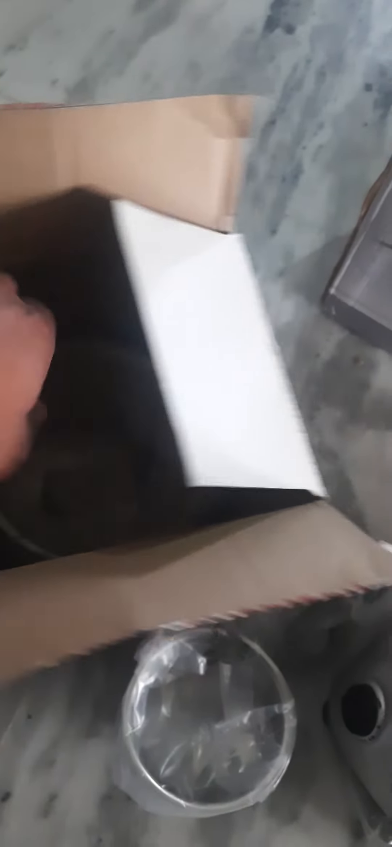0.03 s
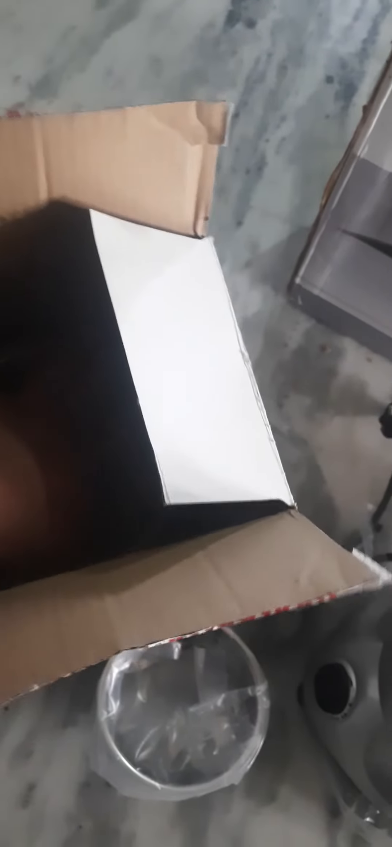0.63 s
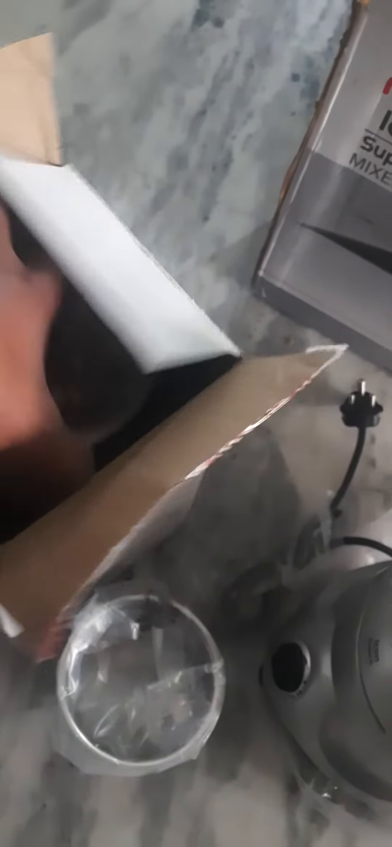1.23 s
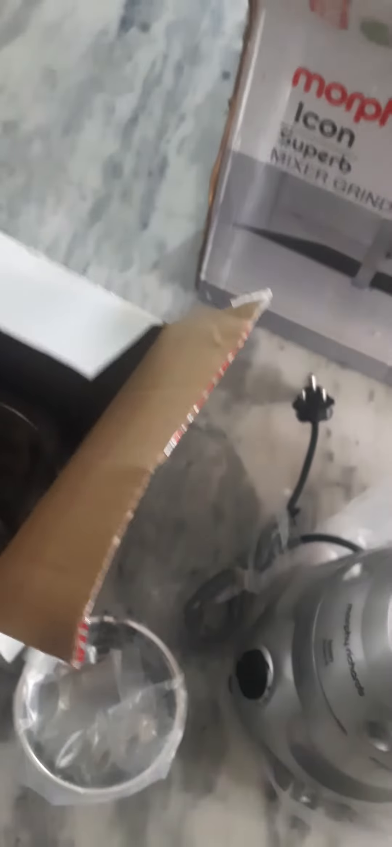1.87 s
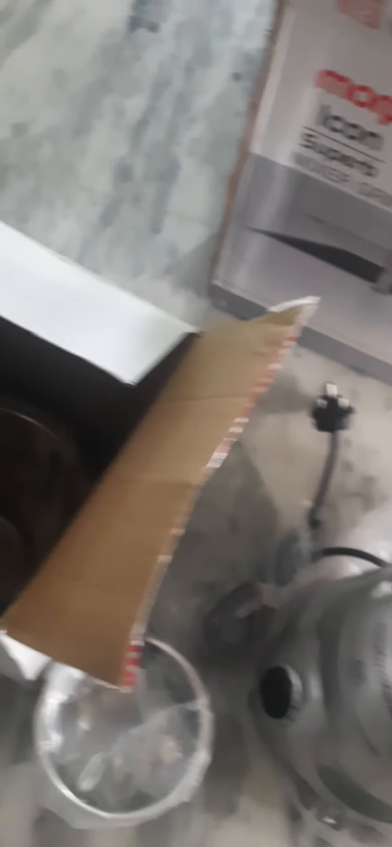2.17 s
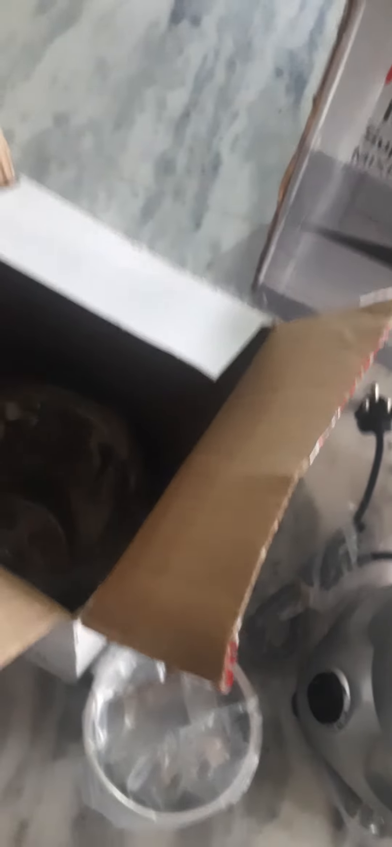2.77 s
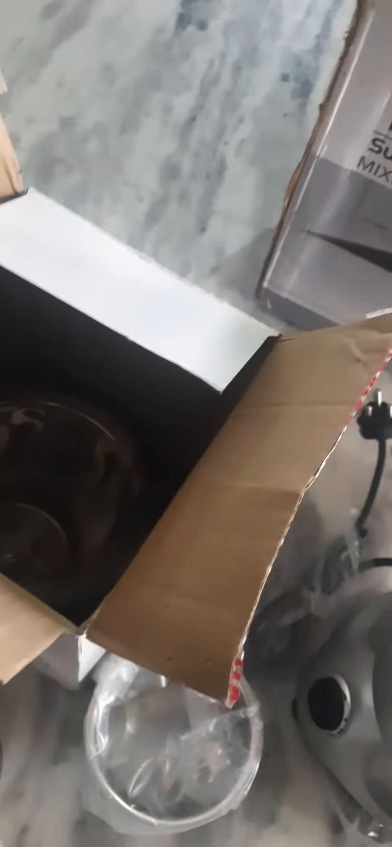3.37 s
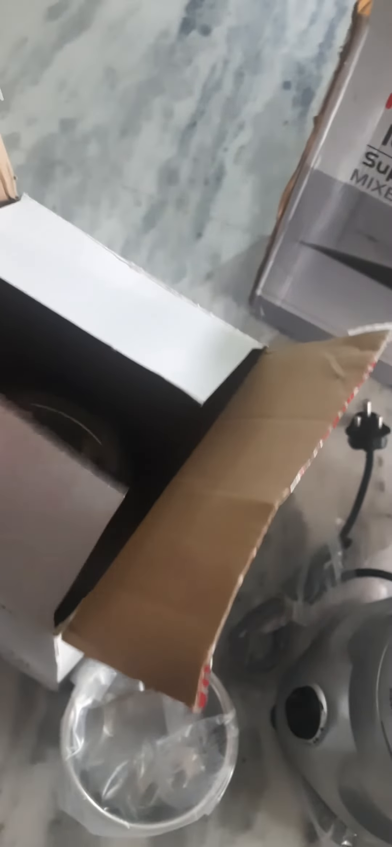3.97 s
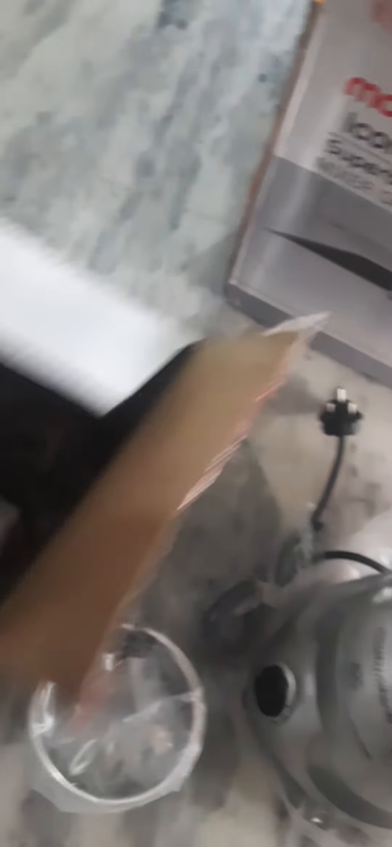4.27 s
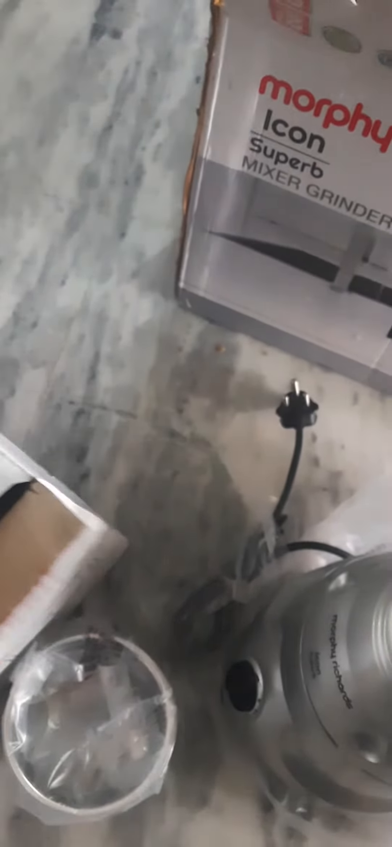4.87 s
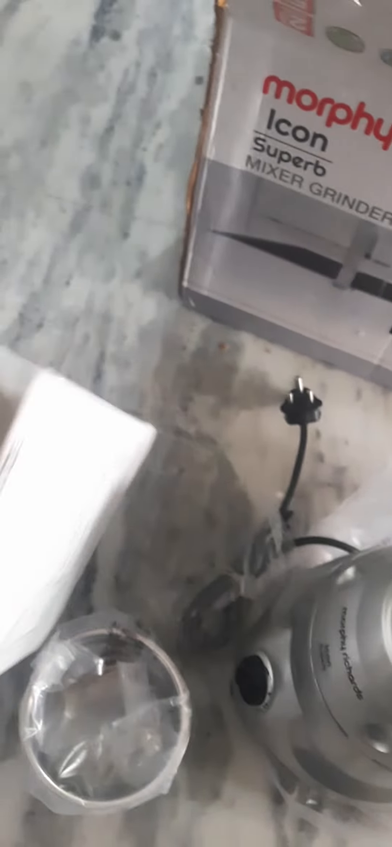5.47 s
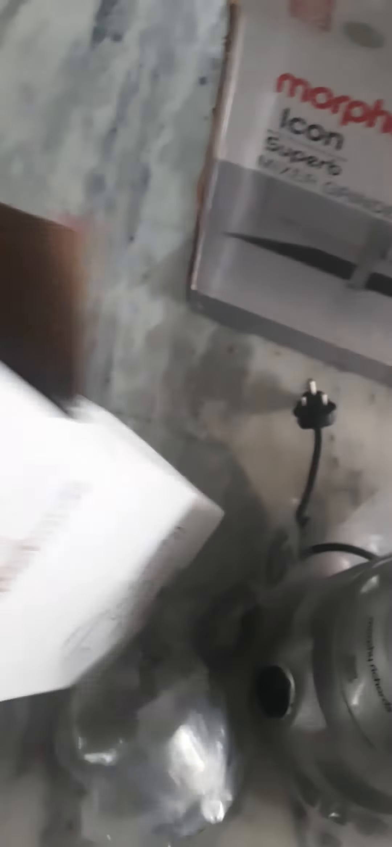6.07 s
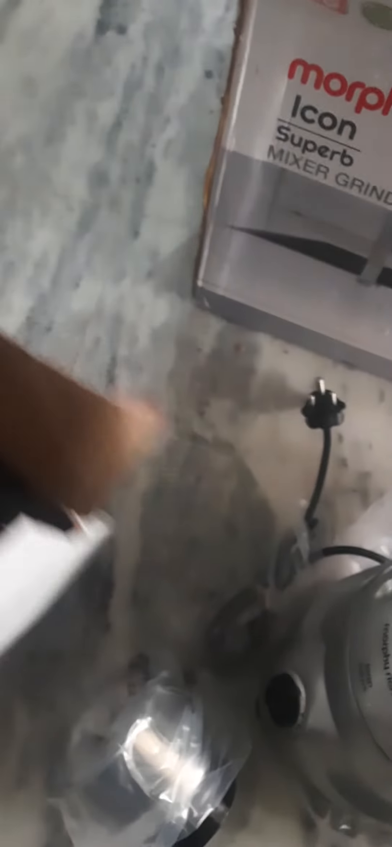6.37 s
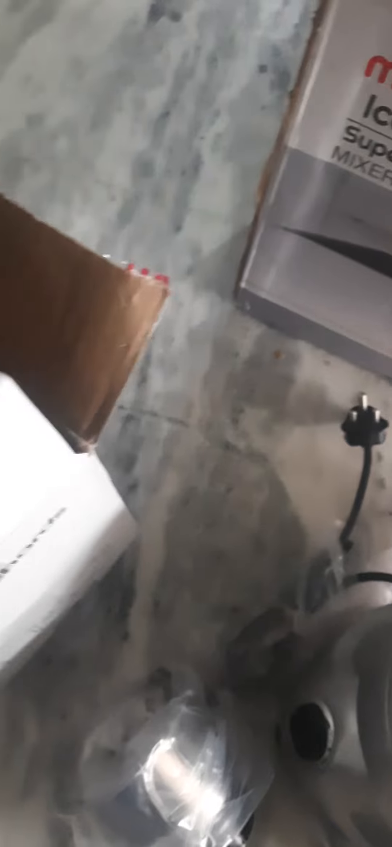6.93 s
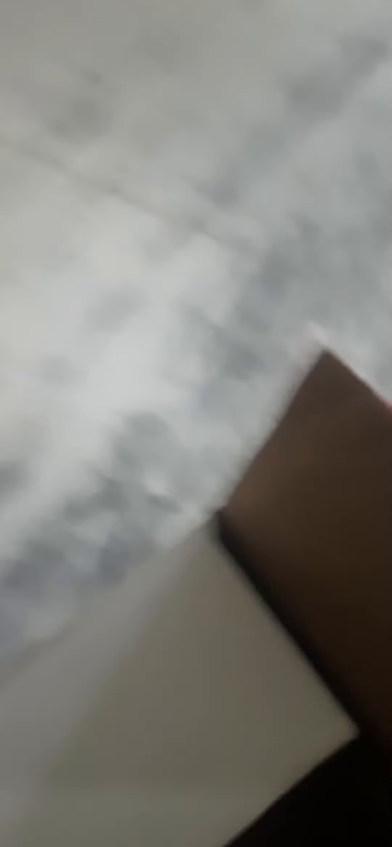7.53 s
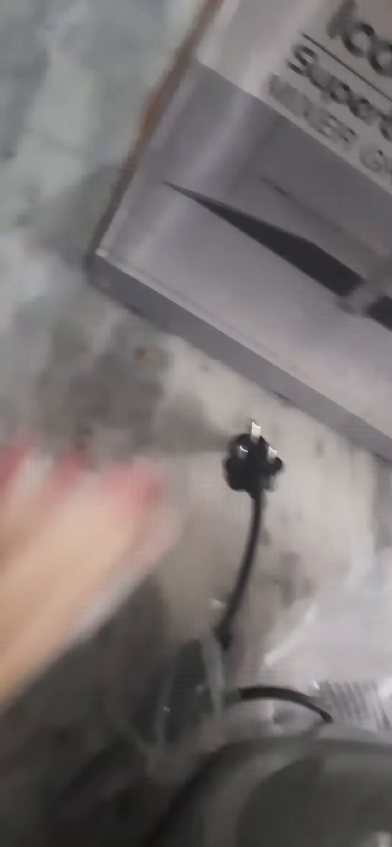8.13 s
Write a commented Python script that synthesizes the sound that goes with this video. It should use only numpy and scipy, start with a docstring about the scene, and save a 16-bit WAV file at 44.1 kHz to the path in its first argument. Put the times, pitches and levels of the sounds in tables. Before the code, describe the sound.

A cardboard box is unpacked on a stone tabletop, close to the microphone. Soft bumps and rubbing flaps open the first second, building to a scrape, a thud and a sharp crackle of packaging around 1.3 seconds. At about 2 seconds a plastic jar is set down with a brief hollow ring. A lull follows, with only a few faint ticks and rustles. From 4 seconds the box is shoved and turned: board flexes and slides, creases and plastic wrap snap, and the walls knock at 4.5 and 5.2 seconds. Near 6 seconds come louder knocks and a hollow, juddering rasp of a dragged edge, then lighter crackling. From 7.7 seconds to the end, the box brushes right past the microphone with heavy thumps, scraping and loud rustling. A short room echo and a faint low hum lie behind everything.

```python
"""A stone tabletop in a small room: a cardboard box is unpacked and turned over, close to the microphone.
Hands and flaps flex the board and make its fibres catch and slip. The walls knock, a jar is set down,
creases and plastic wrap snap, and dragged edges judder into a hollow rasp.
At the end the box brushes right past the microphone. Behind it all are the room's echo and a low hum."""
import sys
import numpy as np
from scipy import signal
from scipy.fft import rfft, irfft, next_fast_len
from scipy.io import wavfile
from scipy.ndimage import uniform_filter1d

SR = 44100
rng = np.random.default_rng(int(sys.argv[2]) if len(sys.argv) > 2 else 0)


def output_pcm(signal):
    """Save a mono or channel-first signal as 16-bit PCM at the path in sys.argv[1].

    Samples are clipped to [-1, 1] before scaling.
    """
    pcm = np.clip(np.atleast_2d(signal).T, -1, 1) * 32767
    wavfile.write(sys.argv[1], SR, np.round(pcm).astype(np.int16))


N = 361619
TIME = np.arange(N) / SR


# tone of flexing walls, rubbed board and rustling surface: f/Hz, relative level/dB
FLEX_EQ = [(25, -22), (48, 1.5), (80, 2.5), (135, 3.5), (200, -5), (320, 1), (430, -7.5), (600, -13),
           (1200, -42.5)]
RUB_EQ = [(200, -19), (450, 1.5), (600, -0.5), (900, -2), (1250, -1.5), (1700, -10.5), (2400, -11),
          (3500, -18.5), (8000, -41.5)]
RUSTLE_EQ = [(900, -9.5), (2000, 2), (2900, -1), (5000, -0.5), (6500, -5), (8200, -4), (9900, -9.5),
             (12300, -4), (15800, -8.5)]

def handling():
    """The walls flex in slow lumps while fibres catch and let go, giving rub and rustle together."""
    flex_gain, rub_gain, rustle_gain = hand_moves()
    lumps = stick_slip(per_s=200, spread_db=2.5, fade_s=0.0059, smooth=0.059)
    fibres = stick_slip(per_s=400, spread_db=5.5, fade_s=0.0091, smooth=0.66)
    flex = gain_of(-2.5) * steadied(colour(noise_pair() * lumps, FLEX_EQ), window_s=.06) * flex_gain
    rub = gain_of(-3) * colour(noise_pair() * fibres * rub_gain, RUB_EQ)
    surface = unit_rms(colour(noise_pair() * fibres + gain_of(-4) * crinkle(), RUSTLE_EQ))
    rustle = gain_of(-0.03) * tabletop_bounce(surface) * rustle_gain
    return at_hands(flex + flap_echo(rub + rustle))


# a hand or flap slides over the board: crest t/s, length/s, flex/dB, rub/dB, rustle/dB
HAND_SLIDES = [(0.209, 0.073, -42, -55, -50), (0.565, 0.045, -42, -45, -62),
               (0.672, 0.15, -37, -37.5, -46.5), (0.807, 0.069, -46, -42.5, -51),
               (1.208, 0.18, -34, -44, -43.5), (1.29, 0.16, -36.5, -35, -37.5),
               (1.385, 0.172, -31, -39, -38.5), (1.596, 0.17, -41.5, -42, -58.5),
               (2.045, 0.052, -49, -42, -46), (3.427, 0.23, -58, -63, -63.5),
               (4.023, 0.043, -49, -41, -53.5), (4.107, 0.13, -55, -50, -59),
               (4.638, 0.18, -36.5, -44.5, -47.0), (4.776, 0.087, -35.5, -45, -42),
               (4.859, 0.21, -33.5, -47, -47), (5.166, 0.21, -38, -46.5, -46.5),
               (5.3, 0.25, -35, -43, -42.5), (5.639, 0.082, -52, -46.5, -44), (5.755, 0.12, -37, -47, -46),
               (6.11, 0.29, -44, -37, -45), (6.289, 0.14, -38.5, -44, -51),
               (6.574, 0.14, -37.5, -40.5, -45.5), (6.676, 0.064, -44, -45.5, -48.5),
               (6.866, 0.17, -51, -53.5, -52.5), (7.064, 0.18, -54.5, -52, -46),
               (7.347, 0.1, -40.5, -39.5, -45), (7.756, 0.14, -37.5, -44, -42.5),
               (7.868, 0.17, -27, -31.5, -35.5), (8.031, 0.28, -31, -36, -28.5),
               (8.177, 0.22, -35, -35, -29)]
# the box is gripped or shoved: t/s, time to fall 20 dB/s, flex/dB, rub/dB, rustle/dB
BOX_SHOVES = [(0.111, 0.15, -33, -46, -53), (0.499, 0.21, -34, -51, -58.0), (0.933, 0.23, -35, -43, -48),
              (1.987, 0.3052, -35.5, -50, -59), (3.227, 0.02, -53, -59, -64.5),
              (3.919, 0.27, -43.5, -58, -89), (4.165, 0.2, -54, -53.5, -66),
              (4.286, 0.56, -46.5, -50.5, -56.5), (4.522, 0.05, -27, -30.5, -40.5),
              (5.193, 0.01, -27, -35, -44), (5.579, 0.17, -39, -51, -52), (5.847, 0.8, -38.5, -46, -59),
              (5.952, 0.1832, -24.5, -27.5, -42), (6.475, 0.26, -43, -47, -58),
              (6.754, 0.035, -36.5, -46, -40), (7.362, 0.22, -38, -51, -51)]
# the carried box chafes in the hands: start/s, end/s, flex/dB, rub/dB, rustle/dB
BOX_HOLDS = [(0.0, 1.477, -51, -55.5, -57.5), (4.277, 6.354, -53, -58.5, -64.5),
             (4.649, 5.424, -52, -56, -51.5), (6.457, 6.74, -50, -56, -63),
             (6.76, 7.34, -51.5, -53.5, -55.5), (7.433, 7.747, -60, -58, -61.5)]

def hand_moves():
    """Fader curves for flex, rub and rustle: slides, shoves and holds add up in power."""
    moves = [(slide(s, length), db) for s, length, *db in HAND_SLIDES]
    moves += [(shove(s, settle_s), db) for s, settle_s, *db in BOX_SHOVES]
    moves += [(hold(start, end), db) for start, end, *db in BOX_HOLDS]
    envelopes, levels_db = map(np.array, zip(*moves))
    return np.sqrt(gain_of(levels_db.T) ** 2 @ envelopes ** 2)


def slide(crest_s, length_s, rise_share=0.46, ends_db=-13.5, roundness=1.48):
    """Envelope of a slide: an arch that swells a little faster than it eases off."""
    away = np.maximum((crest_s - TIME) / rise_share, (TIME - crest_s) / (1 - rise_share)) / length_s
    near, envelope = away < 3, np.zeros(N)
    envelope[near] = gain_of(ends_db * away[near] ** roundness)
    return envelope


def shove(s, settle_s, attack_s=0.0082):
    """Envelope of a shove: a quick attack, then an even decay."""
    age = TIME - s
    return np.clip(age / attack_s, 0, 1) * gain_of(-20 * np.maximum(age - attack_s, 0) / settle_s)


def hold(start, end, grip_s=0.062, let_go_s=0.13):
    """Envelope of a hold: grip, steady contact, release."""
    return np.clip((TIME - start) / grip_s, 0, 1) * np.exp(-np.maximum(TIME - end, 0) / let_go_s)


def crinkle(low_hz=2200, high_hz=12000):
    """Fibres and film give way in tiny separate cracks; coarse ones tick low, fine ones high."""
    cracks = 0
    for hz in np.geomspace(low_hz, high_hz, 4):
        ticks = rng.standard_normal((2, N)) * stick_slip(per_s=150, spread_db=3, fade_s=.0004, smooth=0)
        cracks += resonate(resonate(ticks, hz, hz), hz, hz)
    return unit_rms(cracks)


def tabletop_bounce(x, ring_s=0.0055, bounce_db=-4):
    """Sound bounces between box and tabletop for a few milliseconds, carving fixed peaks on each side."""
    t = np.arange(SR // 100) / SR
    taps = rng.standard_normal((2, len(t))) * np.exp(-t / ring_s)
    taps *= gain_of(bounce_db) / np.linalg.norm(taps, axis=1, keepdims=True)
    taps[:, 0] = 1  # the direct sound
    return signal.oaconvolve(x, taps / np.linalg.norm(taps[0]), axes=1)[:, :N]


def flap_echo(x, path_s=0.000692, share=0.46, moves_per_s=9):
    """A nearby flap reflects the rubbing; as it moves, the colour shifts like a flanger."""
    moves = np.arange(0, TIME[-1] + 1, 1 / moves_per_s)
    delays = path_s * rng.uniform(.2, 2, (len(moves), 2)).T
    echo = [np.interp(TIME - np.interp(TIME, moves, delay), TIME, side) for delay, side in zip(delays, x)]
    return (x + share * np.array(echo)) / np.hypot(1, share)


# where the hands work: t/s, left over right/dB
HAND_PAN = [(.1, -0.5), (1.3, 1), (2.1, -1), (7.8, -1.5)]

def at_hands(x):
    """Pans a sound to follow the hands."""
    return panned(x, np.interp(TIME, *np.transpose(HAND_PAN)))


# hits on the box: t/s, thud level/dB, wall f/Hz, clack level/dB, left over right/dB
WALL_HITS = [(0.1,-28,118,-65,-16), (0.506,-30,148,-39.5,-2), (1.269,-28,910,-31,0),
             (1.311,-16.5,339,-30,-5), (1.396,-25,127,-52,-2), (1.957,-34.5,260,-46.5,-7),
             (2.056,-26,567,-23.5,2.5), (3.917,-39.5,236,-58,-11.5), (4.023,-47,276,-39.5,-5),
             (4.122,-42,115,-37.5,-3.5), (4.346,-33.5,268,-33,-3.5), (4.523,-19.5,328,-30,-4.5),
             (4.746,-32.5,260,-42,-8), (4.774,-27.5,500,-31.5,0), (4.864,-27.5,138,-31,1.5),
             (5.2,-19.5,373,-20,-3), (5.295,-31,150,-30.5,-1), (5.953,-20,353,-16.5,-0.5),
             (5.966,-15.5,314,-34,-2), (6.067,-19,680,-22.5,-2), (6.206,-23,656,-22.5,-2),
             (6.237,-21.5,610,-25.5,2.5), (6.286,-29.5,111,-31.5,2), (6.778,-31,225,-35,-3),
             (7.367,-38,108,-29,2), (7.731,-18.5,97.4,-41,-7.5), (7.814,-24,422,-30.5,-3),
             (7.850,-13.5,151,-20,-8.5), (7.861,-15.5,302,-25.5,-3.5), (7.869,-15,112,-33,-3),
             (7.926,-16,116,-50,-4.5), (8.006,-22.5,133,-22,2), (8.058,-15,420,-21.5,3.5),
             (8.064,-25,61,-45,0), (8.17,-19,216,-52,4)]

def knocks(swell_cycles=0.81, thud_trim_db=-2, clack_trim_db=4):
    """The struck wall thuds for a few cycles; a hard edge also rings the whole box with a clack."""
    out, t = np.zeros((2, N)), np.arange(SR // 5) / SR
    for s, thud_db, hz, clack_db, pan_db in WALL_HITS:
        swell = t * hz / swell_cycles
        thud = gain_of(thud_db + thud_trim_db) * swell * np.exp(1 - swell) * np.sin(2 * np.pi * hz * t)
        clack = gain_of(clack_db + clack_trim_db) * box_ring(t)
        add(out, s, panned(thud + clack, pan_db))
    return out


# body of the box: f/Hz, relative level/dB, t60/s
BOX_MODES = [(128.5, -12, 0.39), (236, -7, 0.15), (329, -1.5, 0.062), (488, -2.5, 0.044),
             (570.4, -6, 0.076), (680, 2.5, 0.021), (938, -1.5, 0.035), (1186, -1.5, 0.023),
             (1388, -9.5, 0.046), (1747, -12, 0.043), (2316, -10, 0.019)]

def box_ring(t, lag_s=.0016, uneven_db=3, phase_rad_per_khz=0.34, grip_detune=0.047):
    """The modes of the box ring; bending waves are dispersive, so the low ones arrive later."""
    hz, db, t60 = np.transpose(BOX_MODES)[:, :, None]
    khz = hz / 1000
    age = np.maximum(t - lag_s / np.sqrt(khz) + lag_s / 2, 0)
    scatter_db = uneven_db * rng.standard_normal((2, len(hz), 1))
    phase = phase_rad_per_khz * khz * rng.standard_normal((2, len(hz), 1))
    grip = 1 + grip_detune * rng.standard_normal((len(hz), 1))  # each grip stiffens the walls differently
    envelopes = gain_of(db + scatter_db - 60 * age / t60) * (age > 0)
    ring = (envelopes * np.sin(2 * np.pi * hz * grip * age + phase)).sum(1)
    return ring / abs(ring).max()


# creases and plastic wrap giving way: t/s, level/dB, ring f/Hz
CREASE_SNAPS = [(.224,-39,4900), (.82,-40,3000), (1.049,-31.5,4330), (1.268,-22.5,2860), (1.99,-44,1980),
                (2.059,-36.5,2200), (3.366,-37.5,6500), (3.551,-44,2900), (4.178,-45.5,1950),
                (4.296,-48,1490), (4.524,-28.5,2380), (4.535,-27.5,4230), (4.961,-36.5,2200),
                (5.09,-36,2900), (5.129,-27.5,2580), (5.146,-37,3700), (5.268,-32.5,2230), (5.303,-32,2400),
                (5.342,-28.5,2440), (5.473,-38,2440), (5.646,-28.5,1770), (5.796,-34.5,4540),
                (5.955,-22.5,1900), (6.108,-28,2400), (6.239,-27,3500), (6.765,-26.5,5070),
                (6.849,-35,5250), (7.032,-36.5,4270), (7.084,-36,5030), (7.247,-33,3200), (7.327,-30,3000),
                (7.572,-33.5,4000), (7.683,-32.5,3430), (7.722,-28.5,3200), (7.817,-22.5,5570)]
# tone of a snap: f/Hz, relative level/dB
SNAP_EQ = [(200, 2), (800, 6.5), (2300, 7), (5000, 5), (8000, 2), (9900, -2), (12300, 0), (15800, -10)]

def snaps(lead_s=0.002, lead_db=-9, crack_s=.0014, tail_s=0.011, tail_db=-16, ring_db=2, trim_db=-2.5):
    """A crease creaks briefly, then gives way: a sharp crack, a short ring and a little noisy tail."""
    out, t = np.zeros((2, N)), np.arange(-SR // 100, SR // 12) / SR
    creak = gain_of(lead_db) * np.exp(-abs(t) / lead_s)
    release = np.exp(-abs(t) / crack_s) + gain_of(tail_db) * np.exp(-abs(t) / tail_s)
    envelope = np.where(t < 0, creak, release)
    for s, db, hz in CREASE_SNAPS:
        crack = rng.standard_normal((2, len(t))) * envelope
        ring = gain_of(ring_db) * resonate(crack, hz, width_hz=450)
        add(out, s + t[0], gain_of(db + trim_db) * colour(crack + ring, SNAP_EQ))
    return at_hands(out)


# one curve for each drag of an edge: t/s, level/dB, hollow f/Hz
EDGE_DRAGS = [
    [(.925, -44.5, 947), (1.03, -58, 820)],
    [(1.14, -46, 1000), (1.17, -40.5, 1140), (1.2, -52, 1200), (1.222, -36, 1230), (1.26, -42, 1220),
     (1.35, -44, 1190)],
    [(1.57, -55, 710), (1.64, -40.5, 680)],
    [(5.957, -30, 696), (6.02, -33.5, 690), (6.07, -27.5, 723), (6.19, -39.5, 664), (6.28, -41.5, 604),
     (6.36, -64, 573)],
    [(7.95, -36, 410), (8.07, -32, 452), (8.16, -40.5, 426)],
]
# formants of the rasp: multiple of the hollow pitch, width of each filter pass/Hz, relative level/dB
HOLLOW_FORMANTS = [(.49, 80, -5), (1, 115, 3.5), (1.45, 250, -15.5), (2.5, 160, -13)]

def drags(wander_share=.05, bends_per_s=55):
    """An edge judders over the board and rings the hollow box, whose pitch wanders as the board bends."""
    out = np.zeros((2, N))
    judder = noise_pair() * stick_slip(per_s=260, spread_db=5.5, fade_s=0.003, smooth=0.24)
    bend_times = np.arange(0, TIME[-1] + 1, 1 / bends_per_s)
    bend = 1 + wander_share * rng.uniform(-1, 1, len(bend_times))
    for curve in EDGE_DRAGS:
        s, db, hz = np.transpose(curve)
        span = (TIME >= s[0]) & (TIME < s[-1])
        t = TIME[span]
        hollow_hz = np.interp(t, s, hz) * np.interp(t, bend_times, bend)
        rasp = 0
        for multiple, width_hz, formant_db in HOLLOW_FORMANTS:
            once = resonate(judder[:, span], multiple * hollow_hz, width_hz)
            rasp += gain_of(formant_db) * resonate(once, multiple * hollow_hz, width_hz)  # steeper skirts
        fader = signal.windows.tukey(len(t), .1) * gain_of(np.interp(t, s, db))
        add(out, s[0], steadied(rasp, window_s=0.022) * fader)
    return out


# body of the jar: f/Hz, level/dB, t60/s
JAR_MODES = [(258, -39, 0.22), (578, -31, .11), (910, -43, 0.17)]

def jar(set_down_s=2.058):
    """A plastic jar is set down and rings briefly with a few hollow notes."""
    out, t = np.zeros((2, N)), np.arange(SR // 2) / SR
    ring = sum(gain_of(db - 60 * t / t60) * np.sin(2 * np.pi * hz * t) for hz, db, t60 in JAR_MODES)
    add(out, set_down_s, np.array([ring, ring]))
    return out


# reverb time: f/Hz, t60/s
ROOM_DECAY = [(200, 0.88), (4000, 0.32), (14000, 0.36)]

def room_reverb(x, predelay_s=0.0036):
    """Hard walls return a dense tail whose treble dies first."""
    hz, t, bands = signal.stft(noise_pair()[:, :SR], SR, nperseg=256)
    decay = gain_of(-60 * t / value_at(ROOM_DECAY, hz)[:, None])
    tail = signal.istft(bands * decay, SR)[1]
    tail *= np.clip(np.arange(tail.shape[1]) / SR / predelay_s - 1, 0, 1)
    return signal.fftconvolve(x, tail / np.linalg.norm(tail[0]), axes=1)[:, :N]


# tone of the still room: f/Hz, relative level/dB
ROOM_TONE_EQ = [(25,-40), (60,-4), (122,-14), (267,-17), (310,-7), (380,-14.5), (460,-21.5), (2500,-37.5),
                (3000,-47), (15500,-53)]

def room_tone(level_db=-57.5):
    """A faint bed of noise, mostly low hum."""
    return gain_of(level_db) * colour(noise_pair(), ROOM_TONE_EQ)


# stereo image of the noise: f/Hz, left-right correlation
STEREO_LIKENESS = [(250, 0.89), (500, 0.62), (1000, 0.29), (2000, 0.041)]

def noise_pair():
    """Stereo white noise: alike in the bass, wide in the treble."""
    size = next_fast_len(N, real=True)
    left, other = rfft(rng.standard_normal((2, size)))
    likeness = value_at(STEREO_LIKENESS, np.fft.rfftfreq(size, 1 / SR))
    right = likeness * left + np.sqrt(1 - likeness ** 2) * other
    return irfft(np.array([left, right]), size)[:, :N]


def stick_slip(per_s, spread_db, fade_s, smooth):
    """Envelope of friction: many tiny releases, a few large, over a share of smooth sliding."""
    size_db = spread_db * np.minimum(rng.exponential(1, N), 4)
    releases = gain_of(size_db) ** 2 * (rng.random(N) < per_s / SR)
    energy = signal.lfilter([1], [1, -np.exp(-2 / (fade_s * SR))], releases)
    return np.sqrt(smooth + (1 - smooth) * energy / energy.mean())


def colour(x, eq, size=4096):
    """Minimum-phase EQ of unit energy."""
    log_gain = np.log(gain_of(value_at(eq, abs(np.fft.fftfreq(size, 1 / SR)))))
    taps = np.fft.ifft(np.exp(np.conj(signal.hilbert(log_gain)))).real[:size // 2]
    return signal.oaconvolve(x, taps[None] / np.linalg.norm(taps), axes=1)[:, :x.shape[1]]


def resonate(x, hz, width_hz):
    """A resonant band-pass that can sweep along a curve."""
    carrier = np.exp(2j * np.pi * np.cumsum(hz * np.ones(x.shape[1])) / SR)
    pole = np.exp(-np.pi * width_hz / SR)
    return 2 * (carrier * signal.lfilter([1 - pole], [1, -pole], x / carrier)).real


def steadied(x, window_s):
    """Rides out the slow swings of level and keeps the fast grain."""
    power = uniform_filter1d((x ** 2).mean(0), round(window_s * SR))
    return x / np.sqrt(abs(power) + 1e-4 * power.mean())


def gain_of(db):
    """Decibels to amplitude."""
    return 10 ** (np.asarray(db) / 20)


def unit_rms(x):
    """Scales to rms 1."""
    return x / np.sqrt(np.mean(x ** 2) + 1e-20)


def value_at(curve, hz):
    """Reads a curve on a log-frequency axis."""
    f, value = np.transpose(curve)
    return np.interp(np.log(hz + 1), np.log(f + 1), value)


def add(mix, s, sound):
    """Drops a stereo sound into the mix at time s."""
    part = mix[:, max(round(s * SR), 0):][:, :sound.shape[1]]
    part += sound[:, :part.shape[1]]


def panned(x, pan_db):
    """Tips a sound left (positive) or right."""
    return x * gain_of(np.array([[.5], [-.5]]) * pan_db)


def scene():
    """The box up close, with three reverb sends and room tone underneath."""
    friction = handling() + drags()
    hits = knocks() + jar()
    cracks = snaps()
    reverb = room_reverb(gain_of(-19) * friction + gain_of(-12) * hits + gain_of(-14.5) * cracks)
    return friction + hits + cracks + reverb + room_tone()


def record(dry, low_cut_hz=40, high_cut_hz=15950):
    """Master EQ: a gentle low cut and a steep high cut."""
    thinned = signal.sosfilt(signal.butter(2, low_cut_hz, "high", fs=SR, output="sos"), dry)
    taps = signal.firwin(511, high_cut_hz, window=("kaiser", 9), fs=SR)
    return signal.oaconvolve(thinned, taps[None], "same")


dry = scene()
out = record(dry)
output_pcm(out)
```